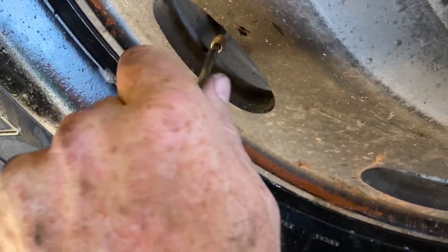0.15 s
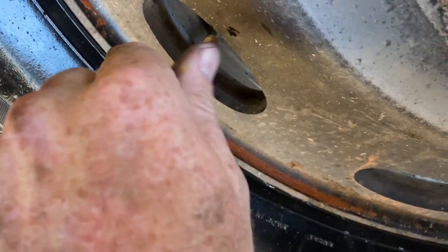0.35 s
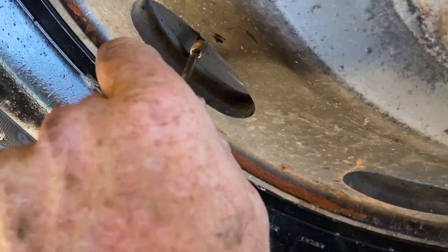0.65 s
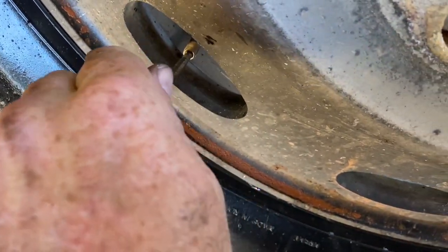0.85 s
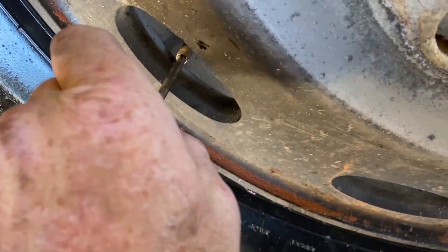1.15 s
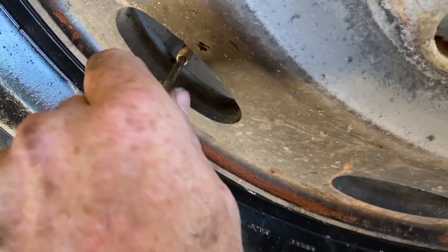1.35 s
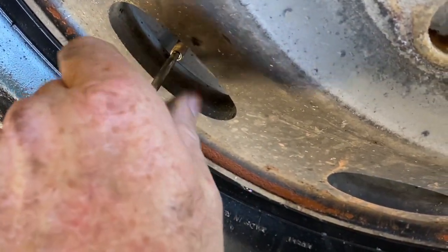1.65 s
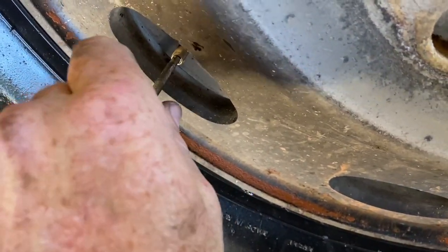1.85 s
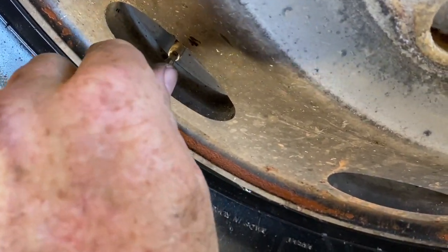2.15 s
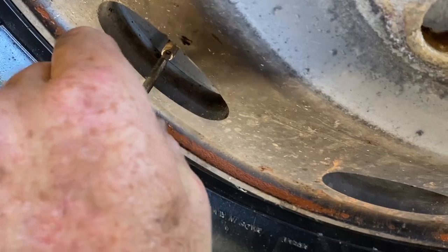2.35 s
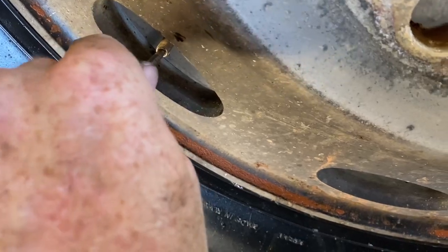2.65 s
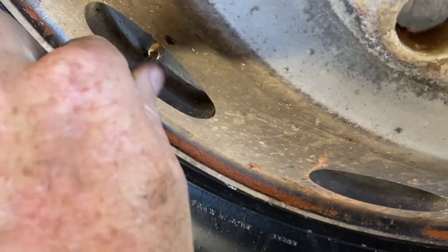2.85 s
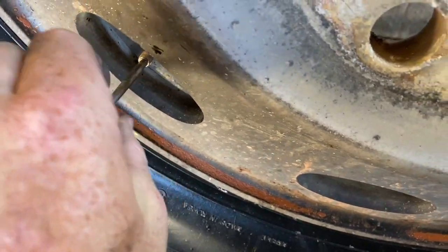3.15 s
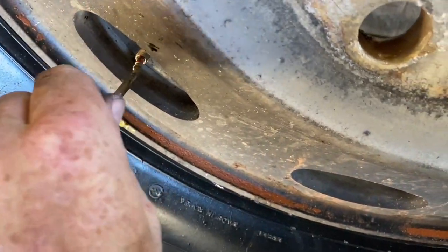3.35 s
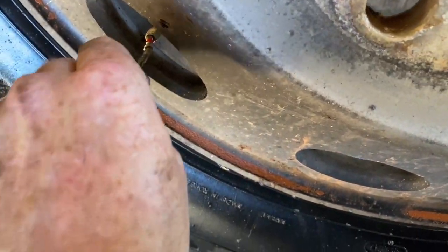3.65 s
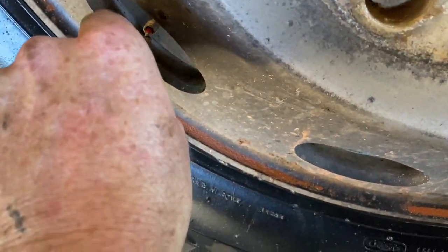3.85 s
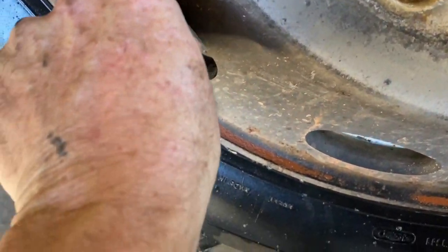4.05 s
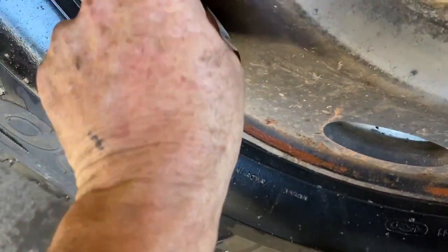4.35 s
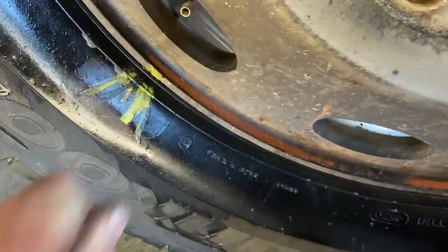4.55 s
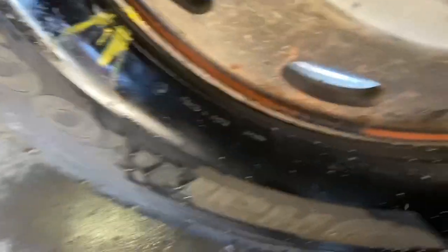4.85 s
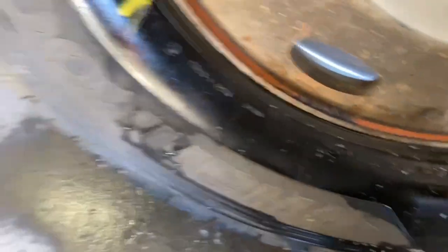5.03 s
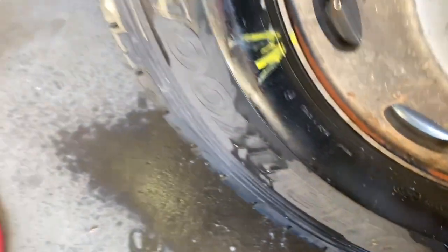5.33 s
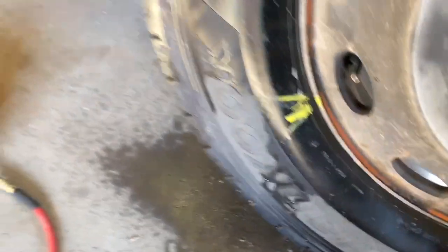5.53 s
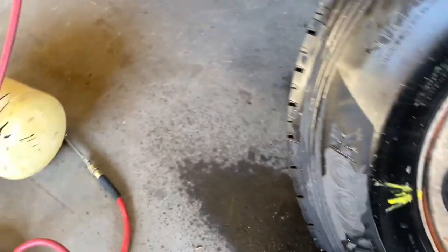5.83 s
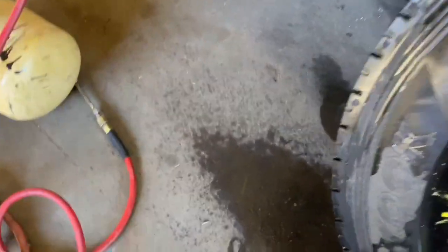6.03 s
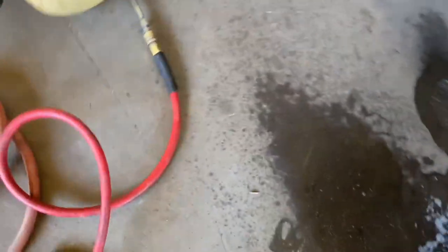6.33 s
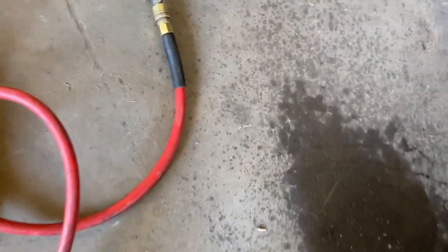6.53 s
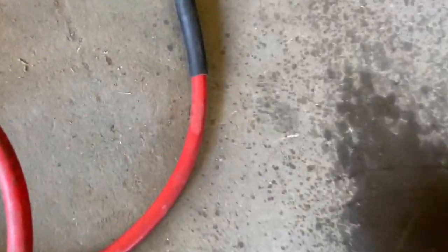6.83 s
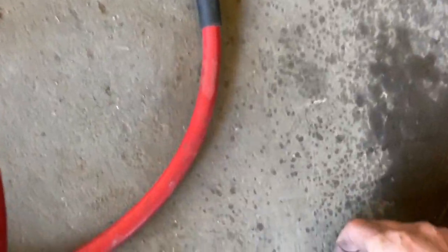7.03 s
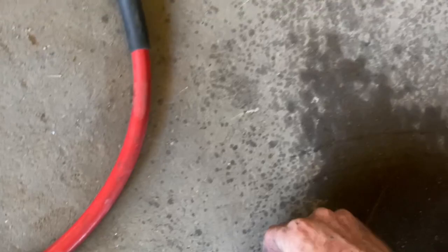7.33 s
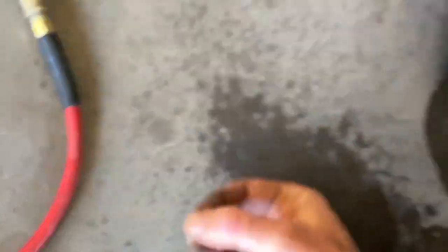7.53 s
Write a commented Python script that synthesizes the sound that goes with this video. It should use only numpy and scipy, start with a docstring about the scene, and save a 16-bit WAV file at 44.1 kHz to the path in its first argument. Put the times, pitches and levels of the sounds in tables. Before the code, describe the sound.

Close up, a tyre valve spits short hisses and clicks, pops open into roaring air, briefly pinched with a squeal, then grows duller and quieter.

```python
"""A workshop: close to a phone, a hand unscrews the core of a truck tyre valve.
Banded noise sputters past the threads, and short noise bursts spurt as the tool ticks. The core pops free
with chirped thumps, and shaped noise hisses and roars over the wheel. A finger thins it to a hollow hiss, then
slips off with a squeal of wavering harmonics. The phone turns away, which takes the roar and leaves mostly
hiss, then comes part of the way back. Sine tones and low noise make a faint motor behind it all."""
import sys
import numpy as np
from scipy.fft import rfft, irfft
from scipy.io import wavfile
from scipy.ndimage import uniform_filter1d

SR = 44100
rng = np.random.default_rng(int(sys.argv[2]) if len(sys.argv) > 2 else 0)


def persist_wave(psi):
    """Save psi, clipped to +-1, as 16-bit WAV."""
    counts = np.round(np.clip(psi, -1, 1) * 32767).astype(np.int16)
    wavfile.write(sys.argv[1], SR, np.atleast_2d(counts).T)


N = 338675
T = np.arange(N) / SR  # s
FREQ = np.arange(N // 2 + 1) * SR / N  # Hz

# spectrum of air that strikes the microphone: (frequency [Hz], level [dB per Hz])
THUMP_COLOUR = [(30, -13), (70, 8), (150, 10), (450, -7.5), (900, -14.5), (1400, -29), (2500, -33),
                (8000, -42.5)]
# resonances of the valve stem: (frequency [Hz], width [Hz], level [dB])
STEM_RESONANCES = [(1990, 140, -5), (2920, 320, -0.5), (3685, 760, 3.5)]


def jet(hiss_gain, roar_gain):
    """The open valve hisses with a shrill band on top, and roars where the air strikes."""
    # spectrum of the hiss: (frequency [Hz], level [dB per Hz])
    hiss_colour = [(100, -24), (450, -26), (1200, -13.5), (2000, -10), (2800, -7), (4200, -3), (5400, -3.5),
                   (7400, 1), (8100, 2), (9200, -1), (10500, 0.5), (12300, -3.5), (14300, 0.5), (16000, -3)]
    # spectrum of the roar: (frequency [Hz], level [dB per Hz])
    roar_colour = [(60, -9.5), (250, -16), (550, -3), (1000, 0), (1550, 0.5), (2500, 1.5), (3600, 1),
                   (4800, -2), (6000, -2), (7500, -7.5), (9500, 1), (11500, -5.5), (15000, -13.5)]
    # shrill band of the jet: (time [s], centre [Hz], level relative to the hiss [dB])
    shrill_path = [(3.22, 9300, -5), (3.6, 9680, -8), (3.95, 9750, 2), (4.2, 7960, -32.5), (4.5, 6160, 5),
                   (4.95, 6270, -2), (5.4, 6880, -25), (5.9, 7360, -26), (6.4, 7470, -11),
                   (7.68, 7390, -0.5)]
    wander_share, shrill_width_hz = 0.025, 800  # wander as a share of the centre frequency

    centre_hz, shrill_db = curves(shrill_path)
    shrill_sides = [resonance(centre_hz * (1 + wander_share * walk(25)), shrill_width_hz) for _ in range(2)]
    shrill = np.array(shrill_sides) * undb(shrill_db)
    hiss = air(hiss_colour, (13300, 14700), likeness=0.28, lead_s=0.000323) + shrill
    hiss = hiss * hiss_gain * undb(0.84 * walk(30))
    roar = air(roar_colour, (1350, 1800), likeness=0.33, lead_s=0.00003)
    roar = roar * roar_gain * undb(1.2 * walk(25))
    flutter = undb(0.33 * walk(16) + 0.25 * walk(300))
    off_wheel = bounce((hiss + roar) * flutter, delay_s=0.0014, strength=0.13, sway=0.061)
    return bounce(off_wheel, delay_s=0.0048, strength=0.16, sway=0.015)


def jet_flow():
    """Gains of hiss, roar and draught: blasts that sag with the pressure and fade as the phone turns."""
    # blasts from the open valve: the core pops free, full jet, the jet strikes the hand, a finger closes in,
    # the finger slips, the tyre empties freely:
    # (start [s], end [s], rise [s], fade [s], hiss [dB], roar [dB], draught [dB], all before the sag)
    blast_rows = [(3.24, 3.28, 0.07, 0.057, -31, -27, -34), (3.21, 3.821, 0.076, .05, -28.5, -36.5, -42.5),
                  (3.341, 3.35, 0.053, 0.06, -41, -32.5, -44), (3.859, 3.96, 0.017, 0.021, -34, -41, -47),
                  (4.152, 4.405, 0.02, 0.071, -36.5, -44, -53), (4.34, 7.68, 0.2, .04, -32.5, -36.5, -39)]
    # the phone turns from the wheel: (time [s], turn [0 facing it to 1 turned away])
    turn_path = [(6.25, 0), (6.48, 0.39), (6.512, 0.47), (6.535, 0.65), (6.7, 0.87), (7.0, 1), (7.1, 0.8),
                 (7.48, 0.74), (7.64, 0.49)]
    sag_db_per_s = np.array([[2.09], [3.0], [2.5]])  # hiss, roar, draught
    turned_hiss_db, turned_roar_db, turned_draught_db = -9.5, -54, -34
    stream_edge, stream_edge_width = 0.39, 0.41  # shares of the turn

    blasts = together(undb(np.array(levels)[:, None] - sag_db_per_s * (T - start)) * swell(start, end, rise, fade)
                      for start, end, rise, fade, *levels in blast_rows)
    turn, = curves(turn_path)
    out_of_stream = np.clip((turn - stream_edge) / stream_edge_width, 0, 1)
    # the hiss fades evenly with the turn, the roar ever faster, the draught past the edge of the stream
    turn_db = [turned_hiss_db * turn, turned_roar_db * turn ** 2, turned_draught_db * out_of_stream]
    return blasts * undb(turn_db)


def leak(hiss_gain, hollow_gain):
    """A thin sputtering hiss past the threads, with a hollow note from the cupped hand."""
    # spectrum of the thin hiss: (frequency [Hz], level [dB per Hz])
    leak_colour = [(100, -22.5), (1800, -21), (2500, -20.5), (4400, -8.5), (5200, -13.5), (5700, -10),
                   (6500, -7), (7500, -8.5), (8400, -4.5), (9300, 0), (11800, -4), (14000, 0), (16000, -6)]
    # spectrum of air caught in the hand: (frequency [Hz], level [dB per Hz])
    hollow_colour = [(40, -23.5), (90, -49), (300, -19.5), (520, -9), (750, 1), (1000, -3.5), (1180, -3.5),
                     (1390, 4), (1620, -12), (2200, -4.5), (2800, -10.5), (3600, -6.5), (4600, -19),
                     (9000, -25)]

    hiss = air(leak_colour, (9000, 11000), likeness=0.52, lead_s=0.000322) * hiss_gain
    hollow = air(hollow_colour, (1120, 1500), likeness=0.87, lead_s=0.00032)
    hollow = hollow * hollow_gain * undb(2 * walk(34.9))
    sputter = undb(0.82 * walk(40) + 0.43 * walk(397))
    return bounce((hiss + hollow) * sputter, delay_s=0.0021, strength=0.168, sway=0.0392)


def leak_flow():
    """Gains of hiss, hollow note and draught: a seep until the core is out, plus a leak at each twist."""
    # twists of the core that let more air by:
    # (start [s], end [s], hiss [dB], hollow note [dB], draught [dB])
    leak_rows = [(-.04, 0.05, -40, -55.5, -63), (0.119, 0.168, -37, -48, -59),
                 (0.185, 0.219, -32, -47.5, -68), (0.694, 0.765, -31.5, -59, -53),
                 (0.773, 0.917, -31, -49.5, -52), (1.008, 1.105, -29.5, -41.5, -53),
                 (1.156, 1.237, -37, -45.5, -57), (1.252, 1.388, -30, -40, -44),
                 (1.413, 1.549, -47, -42, -52), (1.615, 1.716, -35, -43.5, -77),
                 (1.715, 1.86, -64, -44, -83), (1.95, 2.002, -38, -49.5, -60),
                 (2.106, 2.207, -41, -53, -76), (2.314, 2.372, -32.5, -43.5, -69),
                 (2.41, 2.44, -37, -43.5, -67), (2.466, 2.87, -36.5, -44, -53.5),
                 (2.95, 3.084, -38, -72, -53), (3.193, 3.273, -35, -34, -47)]
    core_out_s, rise_s, fade_s = 3.25, 0.041, 0.041

    # hiss and hollow note grow as the core unscrews (dB, dB per s)
    seep_db = [-42 + 1.98 * T, -62.5 + 4 * T, np.full(N, -63.5)]
    seep = undb(seep_db) * swell(-1, core_out_s, rise_s, fade_s)
    leaks = together(undb(levels)[:, None] * swell(start, end, rise_s, fade_s)
                     for start, end, *levels in leak_rows)
    return together([seep, leaks])


def covered():
    """Under the finger the air thins to a hollow hiss that rings in the valve stem."""
    # a finger covers the valve: (start [s], end [s], level [dB])
    finger = (3.955, 4.15, -37.5)
    # spectrum of air seeping under it: (frequency [Hz], level [dB per Hz])
    covered_colour = [(100, -19), (450, -25), (800, -15), (1300, -6), (1600, -13), (2000, -11), (2400, -6),
                      (2900, -3), (3450, -1), (4000, -4), (4900, -6), (6000, -3.5), (7300, -5), (8300, -2),
                      (9500, -0.5), (12000, -1), (14000, -3), (16000, -5)]

    start, end, db = finger
    flow = undb(db + 1.0 * walk(30)) * swell(start, end, rise_s=0.025, fade_s=0.03)
    return air(covered_colour, (2500, 11000), likeness=0.72, lead_s=0.0003) * flow


def squeals():
    """Air flutters in a narrow gap: a pitch with unsteady overtones that turns ragged and rasps in the stem."""
    # one list per squeal: (time [s], pitch [Hz], fundamental [dB], second harmonic [dB],
    # higher overtones before their tilt and the stem's lift [dB], roughness [0-1])
    squeal_rows = [
        [(1.044, 1050, -27.5, -46, -51, 0.5), (1.056, 1000, -24.5, -41, -51, 0),
         (1.073, 998, -24.5, -41, -44.5, 0), (1.093, 1028, -23.5, -46, -45.5, 0),
         (1.102, 1030, -55, -50, -46, 0.25)],
        [(4.185, 763, -55, -60, -49, 0.52), (4.208, 821, -26, -47, -48, 0.2),
         (4.228, 915, -35, -31, -40.5, 0.4), (4.25, 1134, -35, -27, -49, 0.2),
         (4.274, 1146, -20.5, -27, -47, 0.2), (4.292, 1237, -19, -48, -46, 0),
         (4.306, 1275, -15, -48, -44, 0.06), (4.316, 1232, -24, -45, -45.5, 0.4),
         (4.33, 1254, -23.5, -52, -49, .7), (4.355, 952, -29.5, -48, -56, 0.94),
         (4.372, 818, -26.5, -55, -50, 0.02), (4.39, 765, -42, -60, -60, .2)],
        [(4.35, 2880, -37, -70, -80, .2), (4.361, 3070, -21.5, -60, -80, 0), (4.369, 3230, -41, -70, -80, 0)],
    ]
    ragged_rate_hz, ragged_share = 300, 0.79  # how fast and how far a rough squeal breaks up
    overtone_tilt_db, flutter_db, jitter_rad = 0.2, 1.5, 0.15  # the tilt is per harmonic

    out = np.zeros(N)
    rasp = sum(undb(db) * resonance(np.full(N, hz), width) for hz, width, db in STEM_RESONANCES)
    wobble, shake, slip = walk(210), walk(ragged_rate_hz), walk(ragged_rate_hz)
    unsteady = [(k, undb(flutter_db * walk(90)), jitter_rad * walk(170)) for k in range(2, 8)]
    for rows in squeal_rows:
        gate = during(rows)
        on = gate > 1e-6
        hz, db, second_db, higher_db, rough = (curve[on] for curve in curves(rows))
        phase = 2 * np.pi * np.cumsum(hz * (1 + 0.063 * rough * wobble[on])) / SR
        ragged = np.clip(ragged_share * rough, 0, 1)
        steady_note = np.sqrt(1 - ragged ** 2) * np.sin(phase)
        broken_note = (shake[on] * np.sin(phase) + slip[on] * np.cos(phase)) / np.sqrt(2)
        note = steady_note + ragged * broken_note
        # the rasp swells once a cycle
        pulsed_rasp = undb(-7.0) * rough * rasp[on] * (1 + 0.49 * np.cos(phase))
        tone = undb(db) * (note + pulsed_rasp)
        for k, flutter, jitter in unsteady:
            if k == 2:
                gain = undb(second_db)
            else:
                gain = undb(higher_db + overtone_tilt_db * (k + 6)) * stem_gain(k * hz)
            tone += gain * flutter[on] * np.sin(k * phase + jitter[on])
        out[on] += np.sqrt(2) * gate[on] * tone
    return close_by(out)


def stem_gain(hz):
    """How much the valve stem lifts an overtone that passes through its resonances."""
    return 1 + sum(undb(db) / (1 + (2 * (hz - mode_hz) / width) ** 2) for mode_hz, width, db in STEM_RESONANCES)


def spurts():
    """Each tick of the tool opens the seat for an instant: a sharp, grainy burst."""
    # ticks that let out a spurt: (time [s], level [dB], decay [s])
    spurt_rows = [(0.248, -36, 0.0024), (1.044, -20, 0.0044), (1.132, -40, .005), (1.1865, -43, 0.0067),
                  (1.276, -33, 0.008), (1.302, -33, 0.06), (1.41, -25, 0.003), (1.987, -28, 0.025),
                  (2.004, -28.5, 0.013), (2.122, -26.5, 0.023), (2.179, -34, 0.011), (2.24, -35, 0.0025),
                  (2.365, -28.5, 0.016), (3.132, -18.5, 0.012), (3.281, -21, 0.038)]
    # spectrum of a spurt: (frequency [Hz], level [dB per Hz])
    tick_colour = [(100, -30.5), (400, -13.5), (750, -6), (1350, 7), (1900, -3), (2700, 7.5), (4500, -0.5),
                   (6500, -1.5), (9500, 6), (16000, 4.5)]

    strength = np.zeros(N)
    for s, db, decay in spurt_rows:
        age = np.maximum(T - s, 0)
        attack = 1 - np.exp(-age / 0.00035)
        strength += undb(db) * attack * np.exp(-np.minimum(age / decay, 50))
    grain = undb(2.9 * walk(630))
    return air(tick_colour, (20, 16000), likeness=0.32, lead_s=0.0001) * strength * grain


def puffs():
    """Air thumps the microphone: a pressure step rings down in pitch, and a ragged eddy follows it."""
    # thumps: (time [s], peak [dB], first pitch [Hz], last pitch [Hz], swell time [s])
    puff_rows = [(0.2455, -28, 910, 90, 0.0021), (.839, -21, 397, 227, 0.0024),
                 (0.8472, -19.5, 123, 48, 0.0057), (1.0435, -22, 800, 400, 0.00065),
                 (1.132, -31, 696, 100, 0.0019), (1.188, -30.5, 700, 550, .0014),
                 (1.276, -29, 800, 330, 0.0018), (1.353, -14.5, 520, 380, 0.0018),
                 (1.35, -34, 160, 55, 0.0048), (1.371, -31, 540, 280, .002), (1.391, -26, 258, 55, 0.0023),
                 (1.4116, -14, 774, 590, 0.00095), (1.4895, -23, 736, 397, 0.0017),
                 (1.4965, -23.5, 790, 560, 0.0018), (1.492, -28, 230, 60.5, 0.0044),
                 (1.553, -33, 420, 130, 0.0023), (1.566, -22, 885, 110, 0.0011),
                 (1.573, -30, 900, 350, 0.0011), (1.5754, -25.5, 130, 50, 0.0032),
                 (2.86, -37, 240, 100, .003), (2.895, -35, 600, 250, .002),
                 (3.1328, -21.5, 950, 650, 0.002), (3.144, -36, 196, 70, 0.0055),
                 (3.272, -4.5, 854, 380, 0.00082), (3.2738, -11, 266, 175, .0024),
                 (3.274, -21, 100, 60, 0.0029), (3.316, -14, 795, 450, 0.00092),
                 (4.44, -29, 433, 236, 0.0041), (4.465, -32, 217, 160, 0.0032)]
    eddy_db = -6.5  # relative to the step

    steps, eddies = np.zeros((2, N))
    t = T[:SR // 5]
    for s, db, first_hz, last_hz, swell_s in puff_rows:
        hz = last_hz + (first_hz - last_hz) * np.exp(-t / (2.06 * swell_s))
        shape = undb(db) * t / swell_s * np.exp(1 - t / swell_s)
        span = slice(int(s * SR), int(s * SR) + len(t))
        steps[span] += shape * np.sin(2 * np.pi * np.cumsum(hz) / SR)
        # the deeper the puff, the more it stirs the air
        stir = min(130 / last_hz, 1)
        eddies[span] += undb(db) * np.sqrt(t / swell_s) * np.exp(-t / (3.1 * swell_s)) * stir
    return close_by(steps) + undb(eddy_db) * eddies * air(THUMP_COLOUR, (20, 16000), likeness=0.94)


def whooshes():
    """A broad low resonance glides during leaks and as the jet opens, slips or turns away."""
    # sweeps: (start [s], end [s], first pitch [Hz], last pitch [Hz], width [Hz], level at mid-sweep [dB])
    whoosh_rows = [(1.03, 1.119, 680, 573, 320, -39), (1.262, 1.426, 480, 424, 480, -43),
                   (3.31, 3.412, 338, 663, 340, -26), (4.428, 4.477, 380, 300, 300, -36),
                   (6.39, 6.474, 750, 450, 420, -41), (6.463, 6.548, 399.6, 150, 243, -43),
                   (6.5, 6.63, 152, 40, 110, -54)]

    out = np.zeros(N)
    for start, end, first_hz, last_hz, width_hz, db in whoosh_rows:
        progress = np.clip((T - start) / (end - start), 0, 1)
        hz = first_hz + (last_hz - first_hz) * progress
        out += undb(db) * np.sin(np.pi * progress) * resonance(hz, width_hz)
    return close_by(out)


def draught(leak_gain, jet_gain):
    """Eddies from the escaping air buffet the phone; gusts that hit the microphone have their own colour."""
    # spectrum of the buffeting: (frequency [Hz], level [dB per Hz])
    draught_colour = [(25, -34), (55, -1), (110, -2), (200, -1), (400, -4.5), (800, -12), (2000, -36),
                      (6000, -48)]
    # the jet brushes the microphone: (start [s], end [s], level [dB])
    gust_rows = [(4.412, 4.46, -33), (4.974, 5.255, -39)]

    gusts = together(undb(db) * swell(start, end, rise_s=0.029, fade_s=0.051) for start, end, db in gust_rows)
    stream = air(draught_colour, (50, 300), likeness=0.75) * together([leak_gain, jet_gain])
    brushes = gusts * air(THUMP_COLOUR, (50, 300), likeness=0.62)
    return (stream + brushes) * undb(1.2 * walk(25))


def fine_hiss():
    """The very top of the hiss, which flares in one leak and in two short swells late on."""
    # level of the finest hiss: (time [s], level [dB])
    fine_level = [(1.33, -45), (1.38, -22), (1.412, -29), (1.43, -60), (6.25, -63), (6.45, -32),
                  (6.55, -38), (6.75, -56), (7.45, -61), (7.6, -34), (7.68, -34)]
    # spectrum of the finest hiss: (frequency [Hz], level [dB per Hz])
    fine_colour = [(100, -59.5), (6000, -30), (9500, -9), (12000, -4), (14000, 6), (16000, -2.5)]

    db, = curves(fine_level)
    return air(fine_colour, (8000, 16000), likeness=0.3) * undb(db) * during(fine_level)


def motor():
    """A distant motor: an unsteady hum of sine tones over a low noise rumble."""
    # tones of the hum, before the overall level: (frequency [Hz], level [dB])
    hum_lines = [(75.4, -64), (150.7, -64), (226.1, -67), (375.5, -75), (452.2, -75.5)]
    # overall level of hum and rumble: (time [s], level [dB])
    motor_level = [(.22, -2), (.3, 5.5), (.8, 7.5), (1.8, -7), (2.3, -11), (2.8, 3.5), (4.1, -12.5),
                   (6.7, -11), (7.0, -25), (7.68, -25)]
    # spectrum of the rumble: (frequency [Hz], level [dB per Hz])
    rumble_colour = [(30, -20.5), (60, 1), (120, -2), (170, -13), (280, -6.5), (600, -25.5), (3000, -60)]
    rumble_db = -67.5  # before the overall level

    db, = curves(motor_level)
    hum = np.zeros(N)
    for hz, line_db in hum_lines:
        gain = np.sqrt(2) * undb(line_db + 2.1 * walk(10))
        hum += gain * np.sin(2 * np.pi * hz * T + 0.3 * walk(6.15))
    rumble = undb(rumble_db) * air(rumble_colour, (40, 300), likeness=0.9)
    return undb(db) * (hum + rumble)


def air(colour, band_hz, likeness=0.5, lead_s=0., bend_hz=1300):
    """Stereo turbulence, rms 1 within a band; its direct share reaches the left port first."""
    hz, db = np.transpose(colour)
    gain = undb(np.interp(np.log(FREQ + 1), np.log(hz), db))
    gain *= FREQ ** 2 / (FREQ ** 2 + 35 ** 2)  # low cut
    in_band = (FREQ > band_hz[0]) * (FREQ < band_hz[1])
    gain /= np.sqrt(np.mean(gain ** 2 * in_band))
    direct, *diffuse = rfft(rng.standard_normal((3, N)))
    share = np.clip(likeness, 0, 1)
    # long waves are nearly in step at both ports
    lead = lead_s * (1 - 1 / (1 + (FREQ / bend_hz) ** 4))
    ports = np.array([direct, direct * np.exp(-2j * np.pi * FREQ * lead)])
    return irfft(gain * (np.sqrt(share) * ports + np.sqrt(1 - share) * np.array(diffuse)), N)


def resonance(hz, width_hz):
    """Turbulence ringing in one resonance that may move, rms near 1."""
    phase = 2 * np.pi * np.cumsum(hz) / SR
    return walk(width_hz / 2) * np.cos(phase) + walk(width_hz / 2) * np.sin(phase)


def bounce(x, delay_s, strength, sway):
    """A reflection off the wheel or floor; its path changes as hand and phone move."""
    echo = [np.interp(T - delay_s * (1 + sway * walk(1.32)), T, side) for side in x]
    return (x + strength * np.array(echo)) / np.sqrt(1 + strength ** 2)


def close_by(x, lead_rad=0.54, left_db=0.5, low_cut_hz=45):
    """A sound at the valve leads in phase and is louder at the left port; its deepest rumble is lost."""
    sides = np.array([[1], [-1]])  # each side takes the level offset, and half the phase lead
    low_cut = FREQ ** 4 / (FREQ ** 4 + low_cut_hz ** 4)
    return irfft(rfft(x) * low_cut * np.exp(0.5j * lead_rad * sides), N) * undb(left_db * sides)


def swell(start, end, rise_s, fade_s):
    """Air flow that rises, holds and is pinched off."""
    opening = np.sin(np.pi / 2 * np.clip((T - start) / rise_s, 0, 1)) ** 2
    return opening * np.exp(-np.clip((T - end) / fade_s, 0, 7) ** 2)


def together(gains):
    """Unrelated flows add in power."""
    return np.sqrt(sum(gain ** 2 for gain in gains))


def walk(rate_hz):
    """Smooth random drift, mostly slower than the rate, with a spread of 1."""
    v = irfft(rfft(rng.standard_normal(N)) / (1 + (FREQ / rate_hz) ** 4), N)
    return v / v.std()


def during(rows):
    """One while a table lasts, with soft edges."""
    return uniform_filter1d(1. * (T >= rows[0][0]) * (T <= rows[-1][0]), 128)


def curves(rows):
    """Each column of a table after the time, as a value per sample."""
    s, *columns = np.transpose(rows)
    return [np.interp(T, s, c) for c in columns]


def undb(db):
    """Decibels to gain."""
    return 10 ** (np.asarray(db) / 20)


def scene():
    """All the sounds mixed, a little to the left."""
    left_db = 0.24  # up on the left, down on the right
    leak_hiss, hollow, leak_draught = leak_flow()
    jet_hiss, roar, jet_draught = jet_flow()
    flows = jet(jet_hiss, roar) + leak(leak_hiss, hollow) + covered()
    flows += draught(leak_draught, jet_draught) + fine_hiss()
    sound = flows + squeals() + spurts() + puffs() + whooshes() + motor()
    return sound * undb([[left_db], [-left_db]])


def record(dry):
    """The left port resonates slightly; its treble is the right port's, late and inverted; the top is cut."""
    left, right = rfft(dry)
    port_hz, port_width_hz, port_db = 5200, 450, 4
    treble_hz, treble_lag, top_hz = 8000, 11, 15700  # lag in samples
    left = left * undb(port_db / (1 + ((FREQ - port_hz) / port_width_hz) ** 2))
    treble = np.clip((FREQ - treble_hz) / 600 + 0.5, 0, 1)
    spread = -right * np.exp(-2j * np.pi * FREQ * treble_lag / SR)
    left = np.sqrt(1 - treble) * left + np.sqrt(treble) * spread
    low_pass = 1 / np.sqrt(1 + (FREQ / top_hz) ** 400)
    return irfft(np.array([left, right]) * low_pass, N)


dry = scene()
out = record(dry)
persist_wave(out)
```